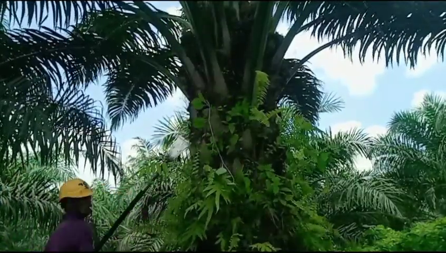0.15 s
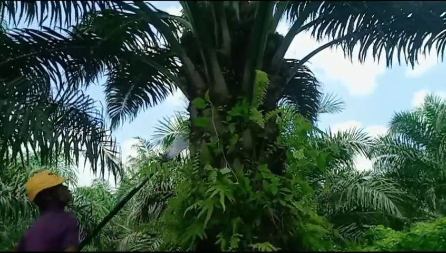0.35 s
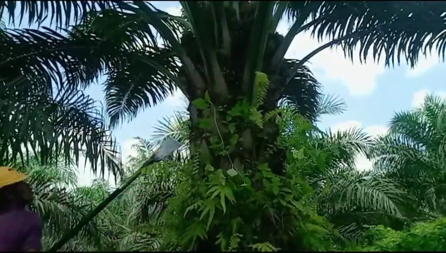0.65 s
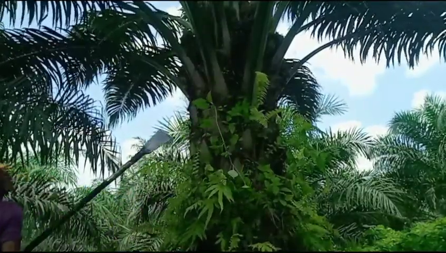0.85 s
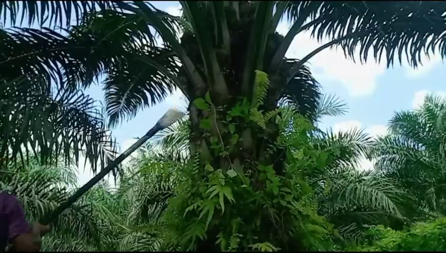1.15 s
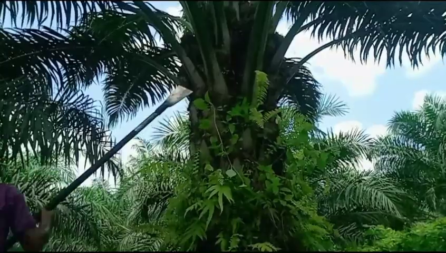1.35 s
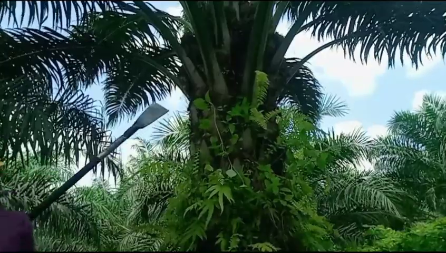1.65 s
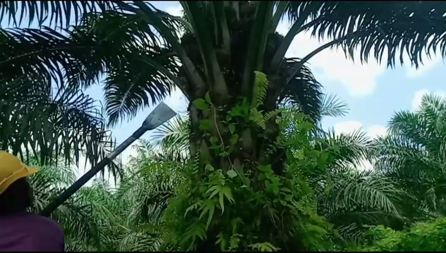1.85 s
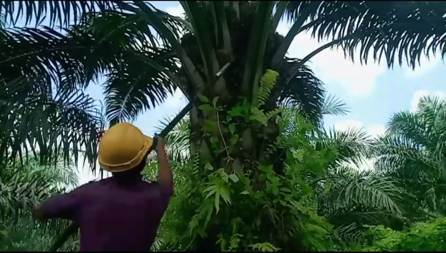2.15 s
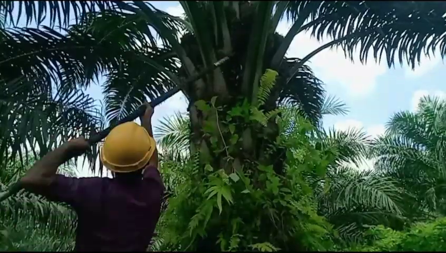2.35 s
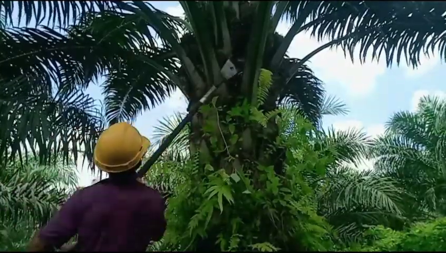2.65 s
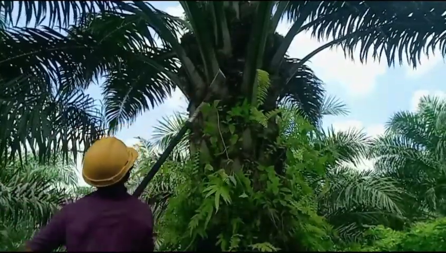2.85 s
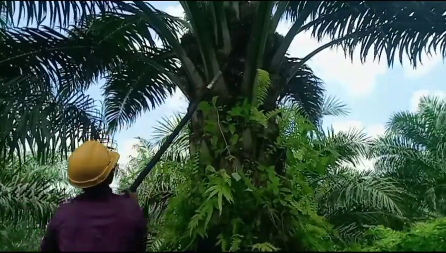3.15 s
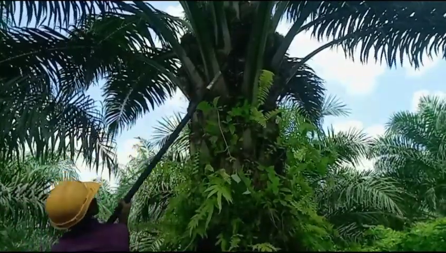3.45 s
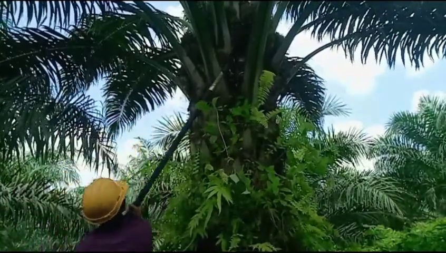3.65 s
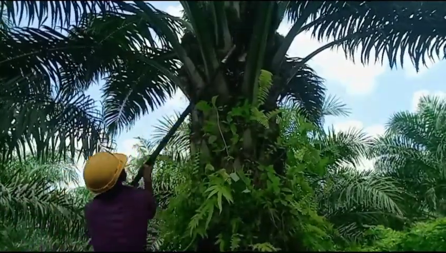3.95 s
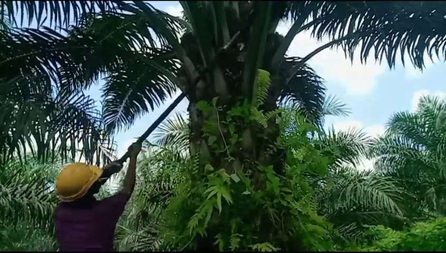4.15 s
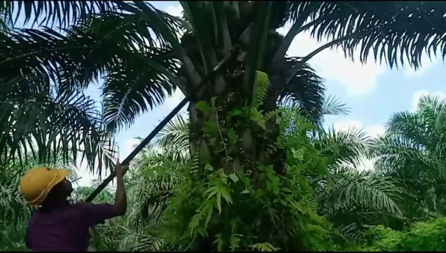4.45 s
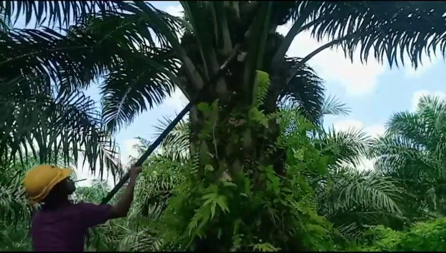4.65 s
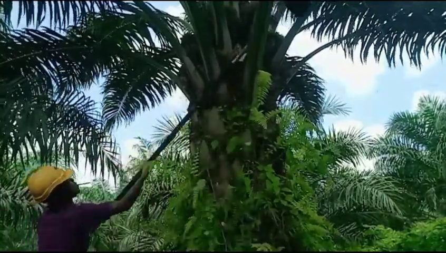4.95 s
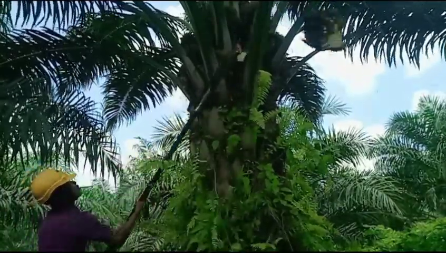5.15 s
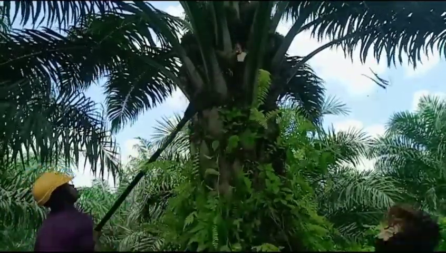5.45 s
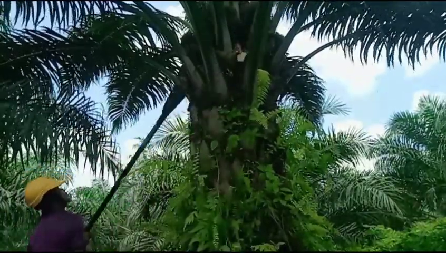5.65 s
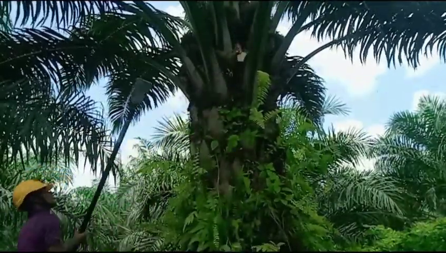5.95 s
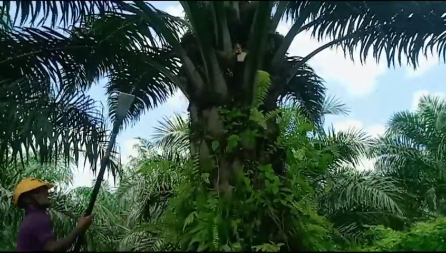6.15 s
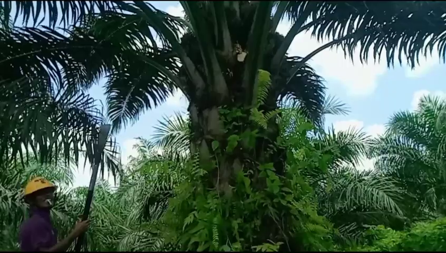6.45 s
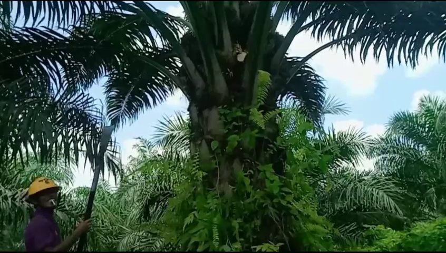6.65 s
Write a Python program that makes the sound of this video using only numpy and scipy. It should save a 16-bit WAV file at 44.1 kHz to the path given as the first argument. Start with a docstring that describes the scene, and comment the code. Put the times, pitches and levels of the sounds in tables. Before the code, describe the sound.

Close, dry cracks and rips of palm fronds being cut, metal scraping and ringing briefly, then one deep thud and fading leaf rustle.

```python
"""A blade on a long pole is driven into palm stalks, close to a small microphone, over insects near 8 kHz and a low hum.
The first thrust crunches at once, dry leaves rustle and settle, and a hard snap comes at 2.2 s with bumps after it.
A thrust at 3.1 s leads into dense tearing and snapping from 3.8 to 5 s, where the scraping blade sings most strongly.
A last crunch and a heavy thud near 5.7 s fade into faint rustling. Noise makes leaves, tears, insects and air;
damped sines make snaps, bumps and cracks; held sines make the singing blade, the hum and two far whistles."""
import sys
import numpy as np
from scipy import signal
from scipy.fft import rfft, irfft, next_fast_len
from scipy.io import wavfile
from scipy.ndimage import uniform_filter1d, map_coordinates

SR = 44100
rng = np.random.default_rng(int(sys.argv[2]) if len(sys.argv) > 2 else 0)


def generate_wav(sig):
    """Save sig (samples, or channels by samples) to the path in sys.argv[1] as 16-bit PCM at SR."""
    pcm = np.round(np.clip(np.atleast_2d(sig).T, -1, 1) * 32767).astype(np.int16)
    wavfile.write(sys.argv[1], SR, pcm)


N = 299439  # length in samples

# Colour of dry leaves and fibres. Each row: frequency in Hz, relative spectrum level in dB.
LEAF_COLOUR = [(590, -36.5), (1000, -14.5), (1100, -11), (1420, -12), (2100, -0.5), (3580, 0), (4790, -11),
               (6780, -17.5), (7700, -15), (8450, -11.5), (9600, -5.5), (12000, -15.5), (14900, -20.5),
               (16000, -7)]
# Colour of the stalk's body. Each row: frequency in Hz, relative spectrum level in dB.
WOOD_COLOUR = [(59, -27), (100, -8.5), (284, -5.5), (547, -5.5), (649, -7.5), (986, -11.5), (1090, -14),
               (1500, -15), (1950, -18.5), (3300, -120)]


def amp(db):
    """Gain of a level in dB."""
    return 10 ** (np.asarray(db) / 20)


def unit(x):
    """x at rms 1."""
    return x / np.sqrt(np.mean(x ** 2) + 1e-20)


def curves(rows):
    """One value per sample for each column after the time."""
    s, *columns = np.transpose(rows)
    return [np.interp(np.arange(N) / SR, s, column) for column in columns]


def wobble(rate):
    """A smooth random curve with rate knots a second, at most 400."""
    knots = rng.standard_normal(int(N * 400 / SR) + 4)
    return map_coordinates(knots, [np.arange(N) * min(rate, 400) / SR])


def coloured(x, points):
    """x through a causal filter with the gain of (Hz, dB) points; white noise keeps its rms."""
    f, db = np.transpose(points)
    log_hz = np.log(np.fft.rfftfreq(4096, 1 / SR) + 1)
    gain = amp(np.interp(log_hz, np.log(f + 1), db))
    # folding the cepstrum forward gives minimum phase: the pulse starts at once
    cepstrum = irfft(np.log(gain + 1e-6))
    cepstrum[1:2048] *= 2
    cepstrum[2049:] = 0
    pulse = irfft(np.exp(rfft(cepstrum)))
    return signal.fftconvolve(x, pulse / np.linalg.norm(pulse))[:N]


def crackle(spiky_db, clump_db, clump_rate):
    """White noise of rms 1 whose samples differ in size like breaking fibres and come in clumps."""
    spikes_db = spiky_db * np.minimum(rng.exponential(size=N), 5)
    size = amp(spikes_db + clump_db * wobble(clump_rate))
    return unit(size * rng.standard_normal(N))


def patchy(depth_db):
    """White noise of rms 1 with random louder and quieter patches in time and frequency."""
    z = signal.stft(rng.standard_normal(N), nperseg=512)[2]
    field = uniform_filter1d(rng.standard_normal(z.shape), size=6, axis=0)
    field = uniform_filter1d(field, size=6, axis=1)
    return unit(signal.istft(z * amp(depth_db * unit(field)), nperseg=512)[1][:N])


def grains(count, centre_hz, spread, cycles, size_db, size=192):
    """Scattered cracks or knocks of rms 1, each a damped ring of size samples at its own pitch."""
    start = rng.integers(0, N, count)
    hz = np.clip(centre_hz * np.exp(spread * rng.standard_normal(count)), 100, 15000)[:, None]
    strength = amp(size_db * np.minimum(rng.exponential(size=count), 4))[:, None]
    k = np.arange(size)
    rings = strength * np.sqrt(hz) * np.sin(2 * np.pi * hz * k / SR) * np.exp(-k / SR * hz / cycles)
    rings = rings * np.cos(np.pi / 2 * k / size)  # ends every ring smoothly
    return unit(np.bincount((start[:, None] + k).ravel(), rings.ravel())[:N])


def shape(length, t60, attack):
    """Time axis and envelope: an exponential rise, a hold to length, then 60 dB of decay per t60."""
    t60 = max(t60, .005)
    t = np.arange(round((length + t60) * SR)) / SR
    decay = amp(-60 * np.maximum(t - length, 0) / t60)
    return t, (1 - np.exp(-t / attack)) * decay


def add(track, s, piece):
    """Mix a piece into a track at a time in seconds."""
    part = track[max(round(s * SR), 0):][:len(piece)]
    part += piece[:len(part)]


def treble(x):
    """The part of x above about 6.5 kHz, filtered both ways so that it stays in time with x."""
    return signal.sosfiltfilt(signal.butter(2, 6500, "high", fs=SR, output="sos"), x)


def background():
    """Insects are a narrow band of fluttering noise, the hum wavering sines, the far air steady noise."""
    # Each row: time in seconds, insect level in dB, hum level in dB.
    air_levels = [(0, -57, -41), (.77, -56, -54.5), (1.99, -56, -52.5), (2.45, -46, -42), (3.2, -50, -51.5),
                  (3.8, -54, -50), (5.5, -52.5, -55), (5.8, -61, -43), (6.13, -60.5, -56), (6.79, -57, -57)]
    # Insect colour. Each row: frequency in Hz, relative spectrum level in dB.
    insect_colour = [(4000, -38), (6800, -21.5), (7150, -17), (7200, -7), (7760, -0.5), (7790, -3),
                     (8170, 2.5), (8560, -7), (9200, -10.5), (12000, -48.5), (20200, -120)]
    # Far air colour. Each row: frequency in Hz, relative spectrum level in dB.
    air_colour = [(18, -27), (30, -22), (112, 5), (184, 0.5), (499, -16), (1280, -16), (3220, -11.5),
                  (6380, -74.5), (8080, -27), (11100, -55), (13700, -28), (14800, -21.5), (16000, -12)]
    # Hum partials. Each row: frequency in Hz, level in dB re the hum level, before wavering.
    hum_partials = [(54.5, -4), (109, -2.5)]
    insects_db, hum_db = curves(air_levels)
    chorus = coloured(patchy(depth_db=.8) * amp(wobble(150)), insect_colour)
    t = np.arange(N) / SR
    drift = .22 * wobble(6)  # cycles
    hum = np.zeros(N)
    for hz, db in hum_partials:
        hum += amp(db + 2.2 * wobble(2.7)) * np.sqrt(2) * np.sin(2 * np.pi * (hz * t + drift))
    air = coloured(patchy(depth_db=1.2), air_colour)
    return amp(insects_db) * chorus + amp(hum_db) * hum + amp(-56) * air


def stirring():
    """Gains of the rustle, its treble and the stalk rub; overlapping movements add in power."""
    # Leaves set moving. Each row: start in seconds, level in dB, rise time constant in seconds,
    # hold in seconds, t60 in seconds, stalk rub in dB re level, treble in dB re level.
    movements = [(0, -28.5, 0.0033, 0.12, 0.42, -8, 0), (0.204, -33, 0.0046, 0.012, 0.085, -3, -7),
                 (0.212, -41.5, 0.018, 0.066, 1, -1.5, 4), (0.493, -53, 0.034, 0.31, 1, -3, 2),
                 (0.792, -52, .005, .02, 1.1, 0, 8.5), (.915, -48, .005, .02, 0.44, -13, 7),
                 (1.06, -51, .004, .012, .15, -6, -2), (1.111, -47.5, 0.0051, 0.054, 0.65, 2, 3),
                 (1.357, -57, .003, .01, .6, -4, -8), (1.44, -54, .004, .014, .2, -3, 5),
                 (1.493, -50.5, 0.0043, 0.017, 0.71, 7, -6), (1.932, -45, .004, .015, 0.33, -4, -1),
                 (2.011, -38.5, .006, .02, .12, -9, -1), (2.04, -51.5, .01, 0.11, .5, 4.5, 3),
                 (2.146, -40.5, .003, .008, .25, -3.5, 4), (2.202, -36.5, .01, 0.072, 9.8, -4.5, 0.5),
                 (2.37, -35, .004, 0.014, 0.11, -1, -1), (2.64, -41.5, 0.007, .025, 0.13, 8.5, -5),
                 (3.054, -33.5, 0.0074, 0.02, 0.15, -0.5, 1), (3.13, -43, .01, 0.035, 0.53, -12, 4),
                 (3.282, -40, 0.0089, 0.025, 0.4, 0, -4), (3.535, -38, 0.0078, 0.016, 0.23, -1.5, -7),
                 (3.721, -38, 0.0068, .018, 0.65, -4.5, 0), (3.791, -20, 0.0084, 0.36, 0.63, -6, 1),
                 (4.116, -28, .006, 0.014, 0.14, -14, 16), (4.261, -31, 0.0078, 0.08, 0.94, -5, 2.5),
                 (4.374, -28.5, 0.0072, 0.14, 0.45, -5, 0), (4.602, -29.5, 0.061, 0.59, 0.52, -7, 5),
                 (4.76, -29.5, .01, 0.16, 0.75, -5.5, 6.5), (5.298, -45, 0.014, 0.37, 1.5, -5.5, 3.5),
                 (5.385, -35.5, 0.019, 0.03, 0.087, -11, 3), (5.96, -41.5, 0.0097, 0.095, 0.41, -10, -1),
                 (6.334, -51, .012, .03, 0.44, -13, -6), (6.46, -52, .02, .045, .25, -7, -4),
                 (6.533, -46, .006, .016, 0.12, -15, -9)]
    # The crown when nothing shakes it: level in dB, stalk rub in dB re level, treble in dB re level.
    at_rest = (-59.5, -2.5, 0)
    rest_db, rub_db, treble_db = at_rest
    power = np.ones((3, N)) * amp([[rest_db], [rest_db + treble_db], [rest_db + rub_db]]) ** 2
    for s, db, rise, hold, t60, rub_db, treble_db in movements:
        envelope = shape(hold, t60, attack=rise)[1]
        for track, extra_db in zip(power, (0, treble_db, rub_db)):
            add(track, s, (amp(db + extra_db) * envelope) ** 2)
    return np.sqrt(power)


def leaves():
    """Dry leaflets scrape as a bed of noise and tiny cracks; stalks rubbing add a duller rumble."""
    rustle, sheen, rumble = stirring()
    cracks = grains(count=16000, centre_hz=4400, spread=0.828, cycles=2.1, size_db=2.5)
    scrape = patchy(depth_db=3.0) * amp(1.66 * wobble(30) + 1.45 * wobble(120))
    bed = coloured(unit(scrape + amp(-5.5) * cracks), LEAF_COLOUR)
    knocks = grains(count=1500, centre_hz=383, spread=0.554, cycles=2.2, size_db=3.5, size=1500)
    rub = unit(crackle(spiky_db=2.5, clump_db=4.5, clump_rate=35) + 0.13 * knocks)
    # rubbing stalks hardly move air below 121 Hz
    rub = signal.sosfilt(signal.butter(1, 121, "high", fs=SR, output="sos"), rub)
    return rustle * bed + (sheen - rustle) * treble(bed) + rumble * coloured(rub, WOOD_COLOUR)


def bumps():
    """A push rings with a sagging pitch; woody knocks also clatter as short rings, mostly high ones first."""
    # Low bumps and thuds. Each row: start in seconds, level in dB, pitch in Hz, t60 in seconds.
    bump_rows = [(.008, -13, 197, .07), (0.042, -12, 224, .09), (.059, -7.5, 81, 0.038),
                 (.106, -23, 299, 0.074), (.195, -36.5, 133, 0.086), (.3, -27, 165, 0.079),
                 (.329, -20.5, 113, 0.04), (.412, -32.5, 379, 0.059), (.503, -31, 110, 0.041),
                 (.616, -33, 176, 0.29), (.659, -38.5, 335, .12), (0.741, -33.5, 546, 0.082),
                 (.818, -41, 160, .06), (1.164, -23, 246, .11), (1.206, -28.5, 170, 0.066),
                 (1.376, -38, 190, 0.073), (1.423, -36.5, 95.5, .08), (1.54, -28.5, 130, .06),
                 (1.55, -30.5, 247, .12), (1.605, -41, 480, 0.13), (1.62, -34, 80, .08),
                 (1.657, -42, 75, .06), (2.05, -36, 84.5, .074), (2.099, -38, 99.6, 0.06),
                 (2.218, -16.5, 302, .073), (2.254, -33, 212, .07), (2.309, -29.5, 81, 0.062),
                 (2.359, -24.5, 88.8, 0.1), (2.41, -17.5, 77.6, 0.047), (2.474, -19.5, 71, 0.1),
                 (2.519, -37, 112, .07), (2.604, -21, 229, 0.11), (2.631, -22.5, 282, .1),
                 (2.67, -31.5, 647, .05), (2.642, -18, 51.1, .11), (2.669, -24.5, 51.1, .09),
                 (2.901, -20, 237, .065), (2.923, -16, 105.6, .098), (2.964, -27, 77, 0.06),
                 (3.028, -31, 64.6, .07), (3.083, -37, 59.2, .07), (3.114, -18.5, 670, 0.085),
                 (3.144, -30, 150, .058), (3.289, -23.5, 260, .05), (3.315, -28, 179, .08),
                 (3.39, -29.5, 279, 0.089), (3.476, -31.5, 72.7, 0.083), (3.556, -29.5, 358, 0.077),
                 (3.85, -27, 319, .07), (3.979, -19, 285, 0.07), (4.019, -11, 598, 0.056),
                 (4.179, -15.5, 277, 0.098), (4.241, -15.5, 256, 0.11), (4.273, -17, 186.6, 0.22),
                 (4.4, -19, 189, 0.14), (4.63, -17.5, 91.5, 0.027), (4.716, -27, 62.4, .11),
                 (4.747, -19.5, 380, 0.09), (4.782, -20, 432, 0.16), (4.803, -30, 83.4, 0.065),
                 (4.84, -22.5, 306, 0.077), (4.877, -19.5, 506, .08), (4.899, -29, 170, 0.059),
                 (4.941, -24.5, 492, 0.11), (5.051, -16.5, 258, 0.11), (5.095, -21, 235, .08),
                 (5.147, -23, 121, 0.085), (5.18, -32, 705, 0.035), (5.199, -32, 133, .075),
                 (5.247, -28.5, 299, 0.09), (5.384, -30.5, 515, 0.051), (5.56, -26.5, 289, .11),
                 (5.714, -10, 700, 0.027), (5.725, -3, 108, 0.059), (5.748, -13, 73, 0.076),
                 (5.951, -36.5, 109, .09), (6.525, -34, 124.7, 0.19)]
    hold_s = .014
    out = np.zeros(N)
    for (s, db, hz, t60), chance in zip(bump_rows, rng.standard_normal((len(bump_rows), 2, 10))):
        t, envelope = shape(hold_s, t60, attack=0.001)
        rough = np.clip(np.log2(hz / 85), .12, .55)  # higher bumps are looser wood
        pitch = hz * np.exp(0.301 + 0.391 * chance[0])[:, None]  # ten clattering rings
        delay = np.abs(chance[1])[:, None] * hold_s * hz / pitch
        late = np.maximum(t - delay, 0)
        clatter = np.sum(np.sin(2 * np.pi * pitch * late) * np.exp(-late * pitch / 2.24), axis=0)
        push = np.sin(2 * np.pi * hz * (t + 0.0012 * (1 - np.exp(-t / 0.0061))))
        add(out, s, amp(db) * envelope * ((1 - rough) * push + 0.99 * rough * clatter))
    return out


def tones():
    """Scraping keeps one steel mode going, unsteady in level and pitch, until it rings out; far whistles waver alike."""
    # Blade modes. Each row: frequency in Hz, t60 in seconds.
    blade_modes = [(1606, .14), (2079, .08), (2342, .08), (2852, .08), (3399, .14), (6651, .1), (7594, .25),
                   (9411, .15)]
    # The blade singing. Each row: start in seconds, mode number from 0, level in dB before wavering,
    # length in seconds.
    sing_rows = [(2.59, 0, -41, .03), (2.64, 4, -42, .06), (2.72, 0, -47, .07), (4.12, 1, -27, .035),
                 (3.535, 1, -43, .04), (4.388, 2, -31, .02), (4.438, 0, -33, .045), (4.446, 4, -29, .036),
                 (4.442, 6, -39, .012), (4.96, 0, -33, .09), (4.965, 7, -28, .03), (5.09, 0, -37, .09),
                 (5.2, 4, -36, .09), (5.205, 5, -47, .035), (6.48, 3, -50, .035)]
    # Two faint far whistles. Each row: start in seconds, pitch in Hz, level in dB before wavering,
    # length in seconds, t60 in seconds.
    whistle_rows = [(1.2, 5760, -74, .09, .1), (1.74, 5880, -74, .11, .1)]
    out = np.zeros(N + SR)
    scrapes = [(s, blade_modes[mode][0], db, length, blade_modes[mode][1])
               for s, mode, db, length in sing_rows]
    slip = .1 * wobble(45)  # cycles
    for s, hz, db, length, t60 in scrapes + list(whistle_rows):
        t, envelope = shape(length, t60, attack=0.0013)
        unsteady = np.resize(slip[round(s * SR):], len(t))
        add(out, s, amp(db) * envelope * np.sin(2 * np.pi * (hz * t + unsteady)))
    return out[:N] * amp(3.5 * wobble(35))


def ticks(count):
    """Rows of faint snaps at chance moments, louder when the leaves are busier."""
    when = rng.random(count) * (N - 1)
    size = rng.standard_normal((count, 3))
    rustle_db = 20 * np.log10(stirring()[0][when.astype(int)])
    level_db = rustle_db + 8.5 + 3.2 * size[:, 0]
    ring_hz = 2780 * np.exp(0.27 * size[:, 1])
    return list(zip(when / SR, level_db, ring_hz, -4 + 5 * size[:, 2]))


def snaps():
    """Each snap is a low and a high ring dying in a few cycles; nearby leaves answer with a short noisy tail."""
    # Single fibres snapping. Each row: start in seconds, level in dB, ring in Hz, treble ring in dB re level.
    snap_rows = [(.013, -10, 2980, -1), (.042, -8, 930, -9.5), (0.302, -19.5, 735, -17.5),
                 (.371, -33.5, 1890, -1), (.417, -28.5, 720, 4.5), (.458, -30.5, 2160, -1),
                 (.75, -36, 760, -4), (.817, -27.5, 3320, -2), (.929, -31.5, 2560, -4),
                 (1.066, -33.5, 2830, -12), (1.172, -23.5, 680, -10), (1.951, -25.5, 2500, -12),
                 (2.023, -30, 3060, -6), (2.15, -36, 2560, -4), (2.202, 3, 3450, -5),
                 (2.207, -14, 3260, -8), (2.375, -21, 2540, -11), (2.9, -30, 850, -4),
                 (3.06, -12, 2480, -14), (3.314, -22, 3380, -10), (3.558, -23.5, 2170, -15),
                 (3.619, -31, 2400, -7), (3.731, -31.5, 2750, 2), (3.767, -23, 4030, 3),
                 (3.798, -6.5, 2800, -15), (3.99, -11.5, 3500, -7), (4.037, -6, 3700, -6),
                 (4.092, -5.5, 1970, 1.5), (4.138, -10, 2230, 1), (4.198, -9, 2170, 2),
                 (4.216, -6.5, 3060, -1.5), (4.243, -9.5, 3030, -18), (4.25, 0, 2920, -23),
                 (4.257, -2.5, 2770, -26), (4.304, -15, 674, -18), (4.324, -19, 3200, -8),
                 (4.432, -12, 2600, -14), (4.485, -5.5, 1980, 6.5), (4.491, -11, 1890, -8),
                 (4.781, -11.5, 3100, -7), (4.856, -0.5, 3970, -3), (4.86, -7.5, 3840, 1),
                 (4.897, -4, 2860, -1), (4.901, -10.5, 2770, -11), (5.18, -22, 700, 13),
                 (5.336, -22, 4400, 3), (5.416, -24.5, 2670, -9), (5.626, -32, 2730, 0),
                 (5.846, -30, 2600, -10), (5.896, -32.5, 3410, -9), (5.96, -35, 2700, -8),
                 (5.979, -24, 2660, -11), (6.5, -31.5, 2840, -15)]
    treble_hz = 9380  # where thin fibres and the microphone port ring
    rings, tails = np.zeros((2, N))
    t = np.arange(SR // 20) / SR
    rows = list(snap_rows) + ticks(count=120)
    tail_shape = amp(-12.5 - 60 * t / 0.0062) + amp(-19.5 - 60 * t / 0.11)
    for (s, db, hz, treble_db), noise in zip(rows, rng.standard_normal((len(rows), len(t)))):
        low = np.sin(2 * np.pi * hz * t) * np.exp(-t * hz / 2.35)
        high = np.sin(2 * np.pi * treble_hz * t) * np.exp(-t * treble_hz / 4.6)
        add(rings, s, amp(db) * (low + amp(treble_db) * high))
        add(tails, s, amp(db) * noise * tail_shape)
    return rings + coloured(tails, LEAF_COLOUR)


def tears():
    """Many fibres give way within some milliseconds, each with its own short ring, and shake the stalk."""
    # Bundles of fibres tearing. Each row: start in seconds, level in dB, woody body in dB re level,
    # treble in dB re level, length in seconds, t60 in seconds.
    tear_rows = [(0.028, -25.5, -7.5, 4, .006, .03), (.039, -14, 1, -0.5, .011, 0.095),
                 (0.059, -30, -5, -2, .006, 0.25), (0.1, -27.5, 6, -1, .009, 0.077),
                 (1.129, -46, -1.5, 5, .006, 0.29), (1.17, -55.5, 7, 0, .005, .13),
                 (1.491, -46.5, 2, -1, .005, 0.25), (1.949, -36.5, 3, -6.5, .0023, 0.16),
                 (2.184, -33, -22, 7.5, .013, .05), (2.201, -11, -3, -6, .0027, .12),
                 (2.294, -29.5, -6.5, -11, .01, 0.48), (2.372, -40, -18, -2, .004, .095),
                 (3.105, -9.5, -11.5, 5.5, .025, 0.058), (3.142, -29.5, -25, 8.5, .015, 0.25),
                 (3.795, -18.5, -19.5, -4.5, .004, .11), (3.86, -15, -6, -0.5, .0043, .064),
                 (3.889, -19, -18, -3, .0033, 0.13), (3.948, -12.5, -7, -9, .007, 0.13),
                 (4.037, -18, -20.5, 3.5, .004, 0.14), (4.086, -18, -24, 6, .0023, 0.038),
                 (4.127, -15.5, -17, -3, .0022, 0.054), (4.487, -24.5, -6, 9, .0015, 0.15),
                 (4.779, -25, -9, -1, .006, 0.22), (4.937, -20, -12, 2, .007, 0.17),
                 (5.686, -19.5, -12, 0.5, .011, .064), (5.694, -12.5, -1.5, -5, .035, 0.034),
                 (5.739, -29.5, -11, -4.5, .013, .17), (5.958, -46.5, -7, -7, .005, 0.12)]
    bright, sheen, dull = np.zeros((3, N))
    for s, db, body_db, treble_db, length, t60 in tear_rows:
        envelope = amp(db) * shape(length, t60, attack=0.21 * length)[1]
        add(bright, s, envelope)
        add(sheen, s, (amp(treble_db) - 1) * envelope)
        add(dull, s, amp(body_db) * envelope)
    rings = grains(count=20000, centre_hz=3980, spread=0.85, cycles=1.4, size_db=4.5)
    fibres = unit(crackle(spiky_db=1.5, clump_db=-0.5, clump_rate=270) + 0.6 * rings)
    crunch = coloured(bright * fibres, LEAF_COLOUR) + treble(coloured(sheen * fibres, LEAF_COLOUR))
    body = coloured(dull * crackle(spiky_db=2.0, clump_db=1.5, clump_rate=140), WOOD_COLOUR)
    return crunch + body


def scene():
    """All sources at one microphone."""
    return (background() + leaves() + bumps() + tones() + snaps() + tears())[None]


def record(dry):
    """The deepest bass is lost, loud peaks flatten towards full scale, and little is heard above 15.5 kHz."""
    bass_hz, faint_above_hz, silent_above_hz = 44.7, 15500, 16670
    sound = signal.sosfilt(signal.butter(3, bass_hz, "high", fs=SR, output="sos"), dry)
    flattened = sound / (1 + np.abs(sound) ** 8) ** (1 / 8)
    m = next_fast_len(N + SR // 2)
    hz = np.fft.rfftfreq(m, 1 / SR)
    band = np.where(hz < faint_above_hz, 1, amp(-42.5)) * (hz < silent_above_hz)
    return irfft(rfft(flattened, m) * band, m)[..., :N]


dry = scene()
out = record(dry)
generate_wav(out)
```